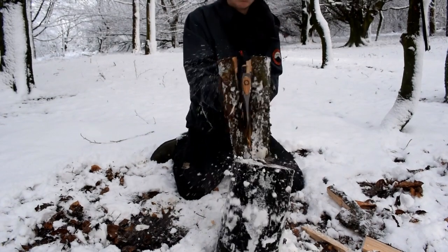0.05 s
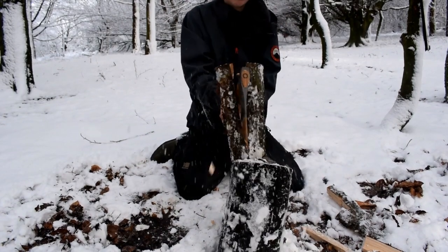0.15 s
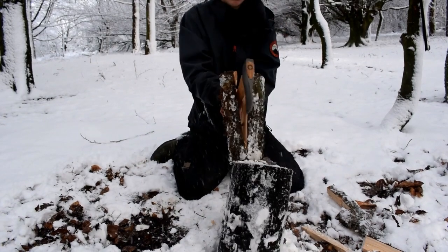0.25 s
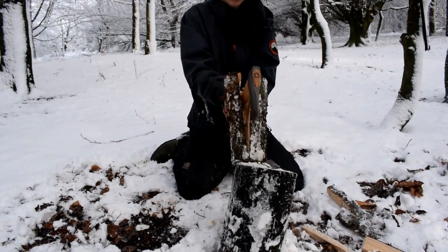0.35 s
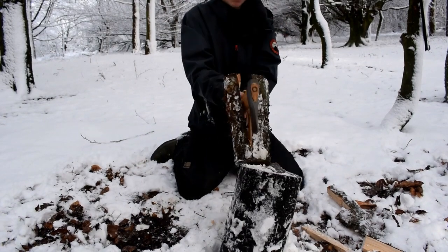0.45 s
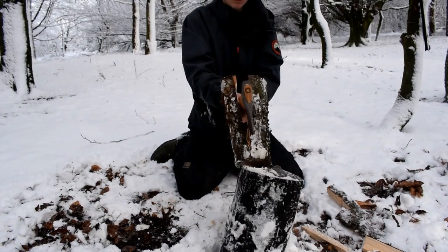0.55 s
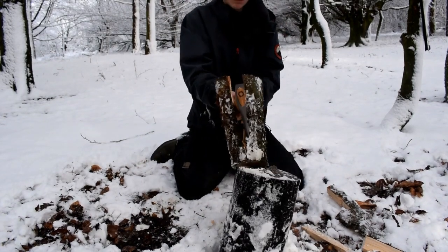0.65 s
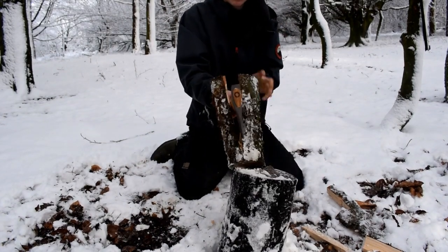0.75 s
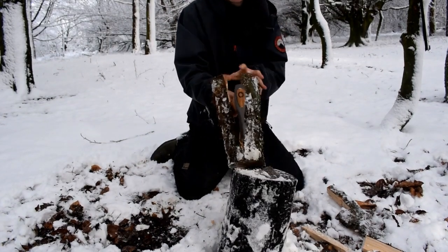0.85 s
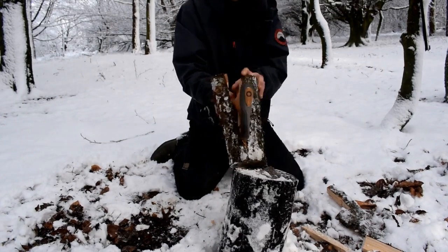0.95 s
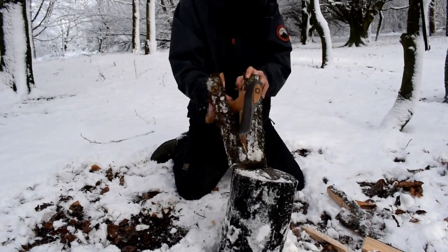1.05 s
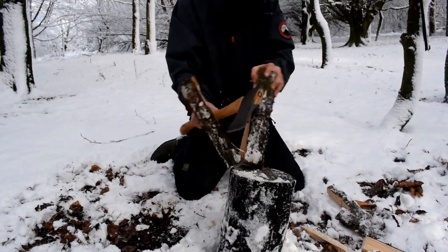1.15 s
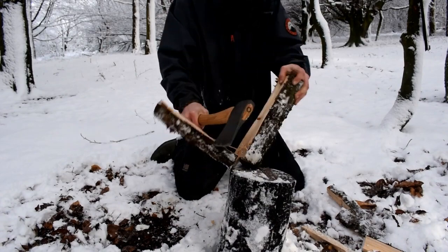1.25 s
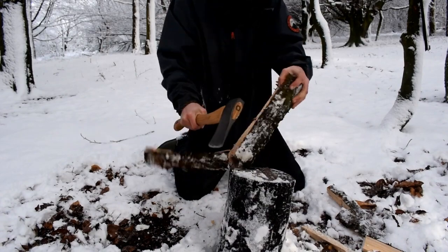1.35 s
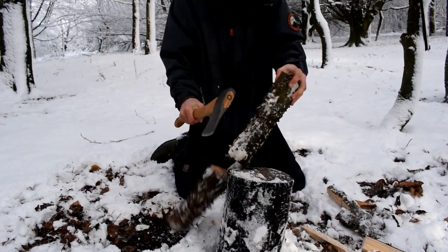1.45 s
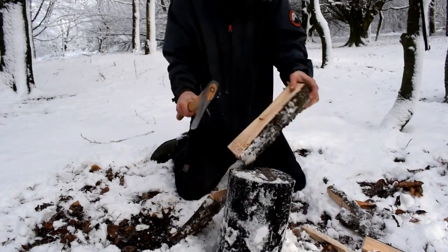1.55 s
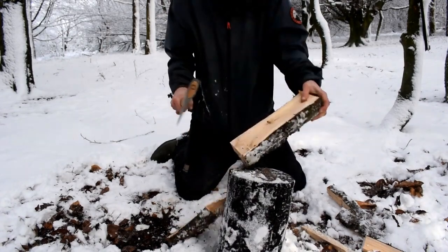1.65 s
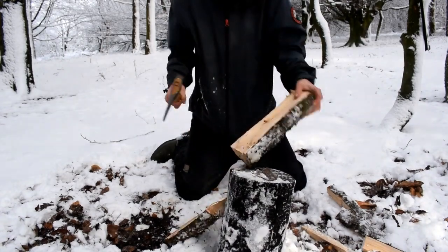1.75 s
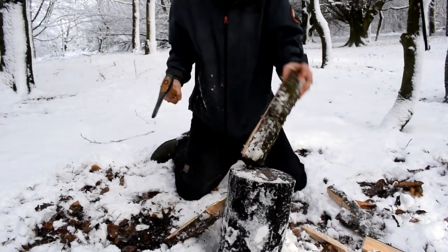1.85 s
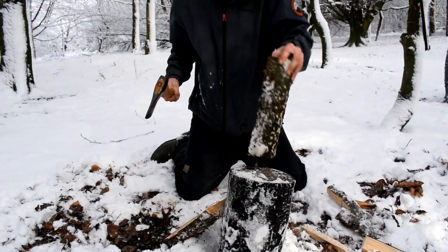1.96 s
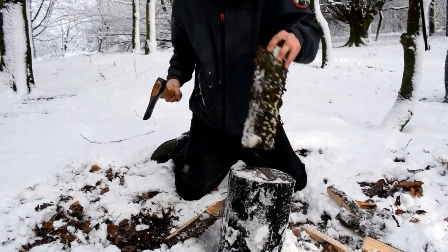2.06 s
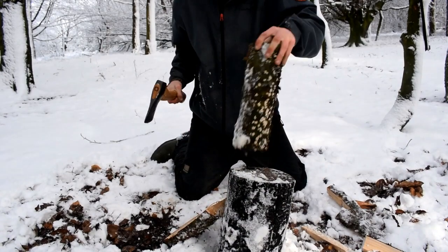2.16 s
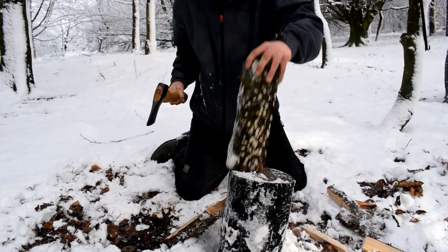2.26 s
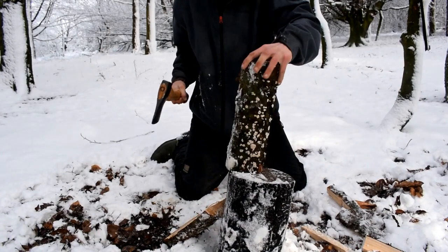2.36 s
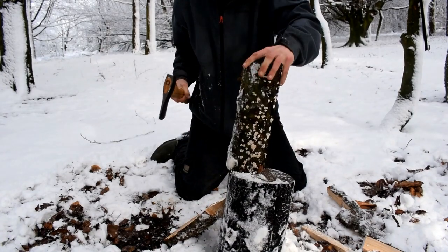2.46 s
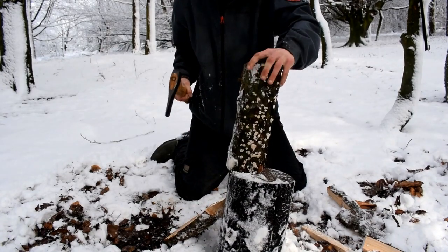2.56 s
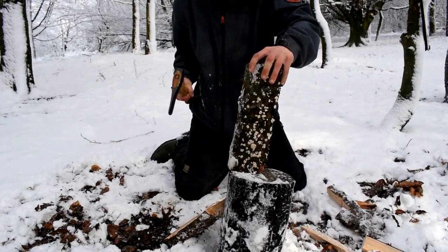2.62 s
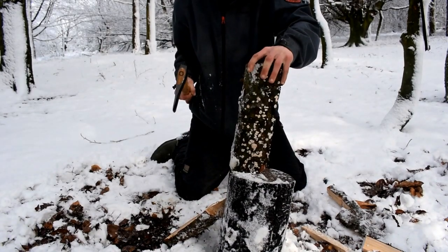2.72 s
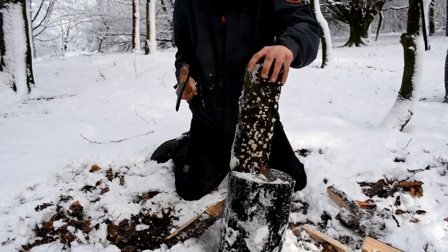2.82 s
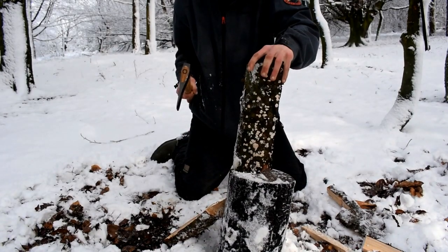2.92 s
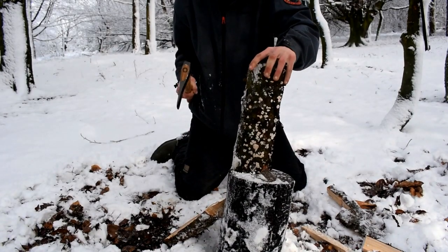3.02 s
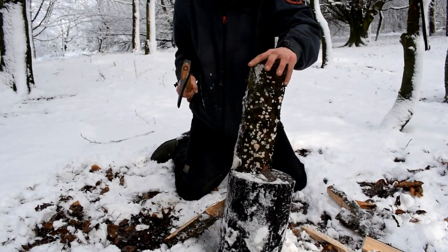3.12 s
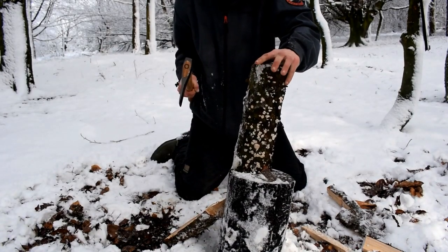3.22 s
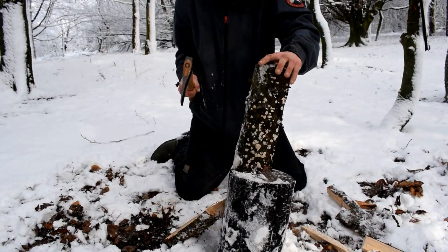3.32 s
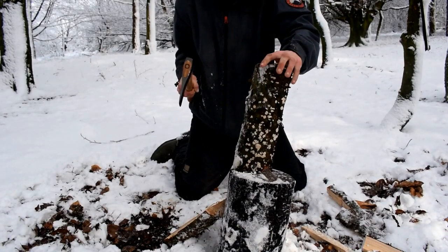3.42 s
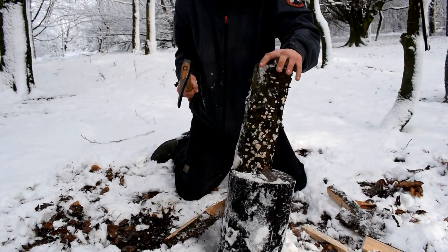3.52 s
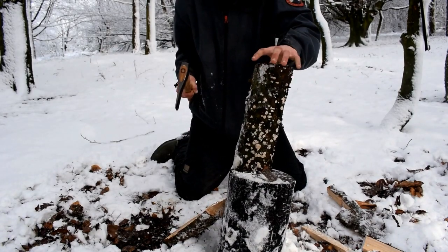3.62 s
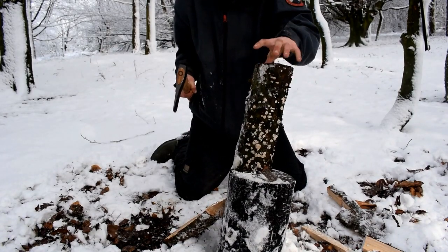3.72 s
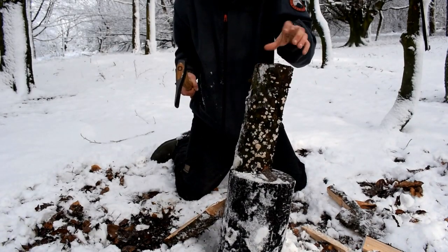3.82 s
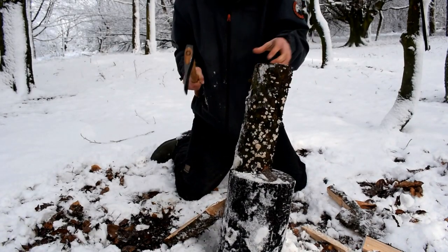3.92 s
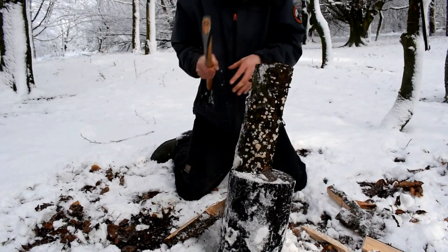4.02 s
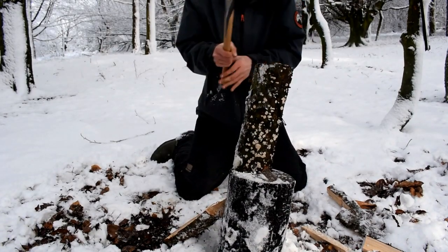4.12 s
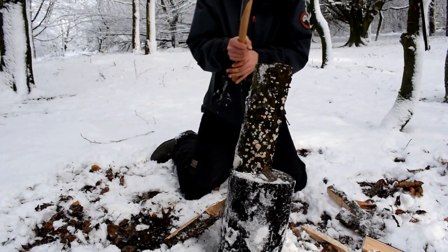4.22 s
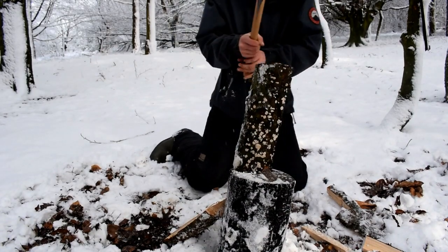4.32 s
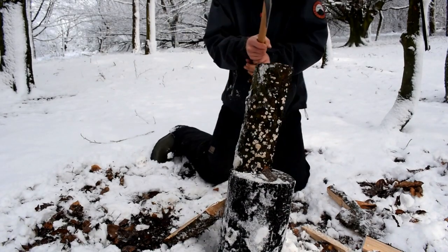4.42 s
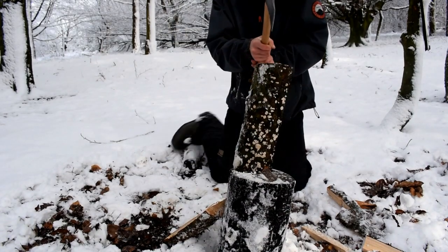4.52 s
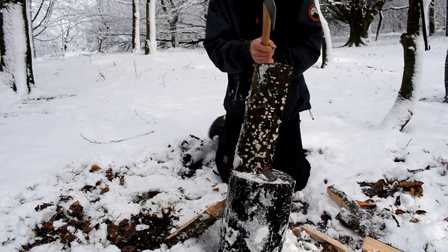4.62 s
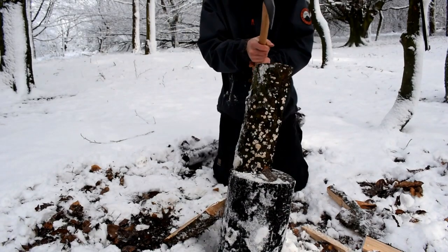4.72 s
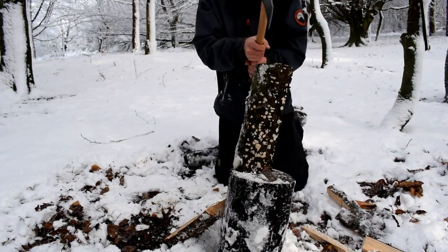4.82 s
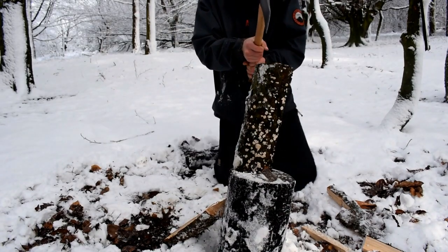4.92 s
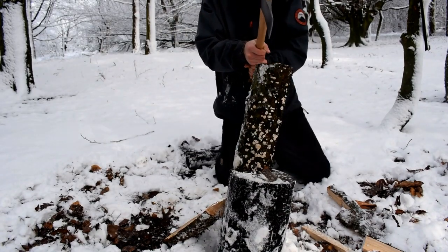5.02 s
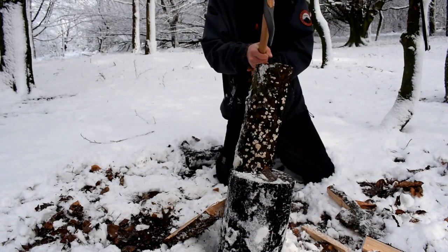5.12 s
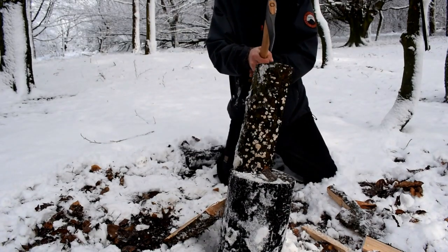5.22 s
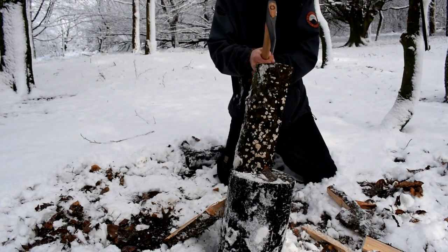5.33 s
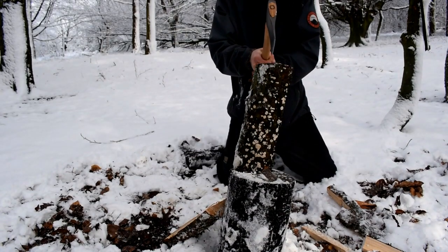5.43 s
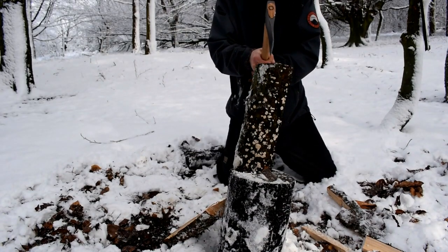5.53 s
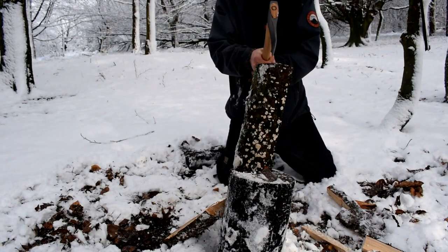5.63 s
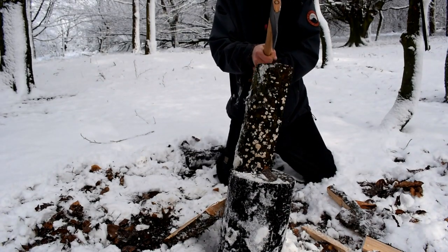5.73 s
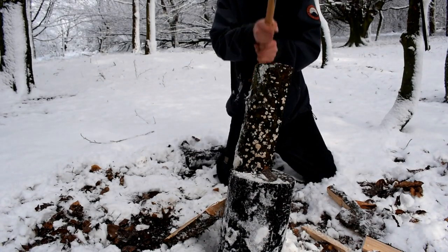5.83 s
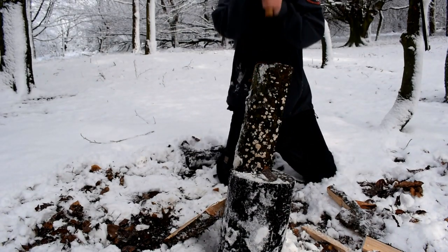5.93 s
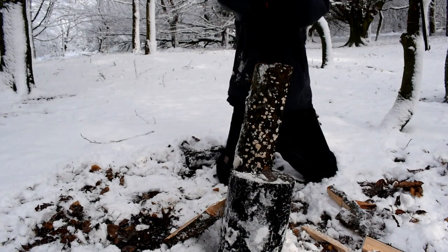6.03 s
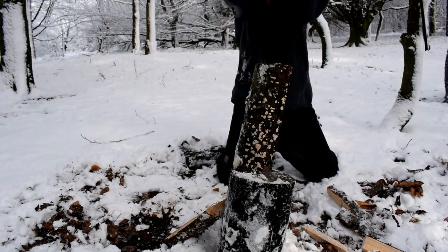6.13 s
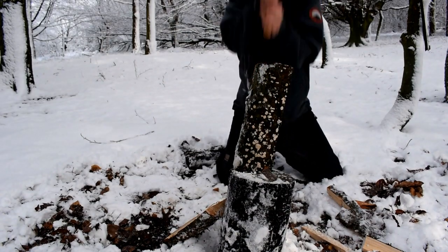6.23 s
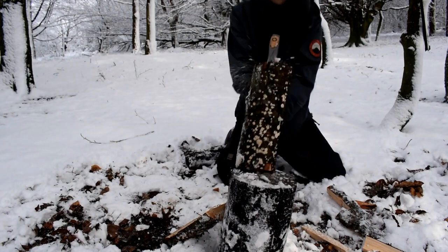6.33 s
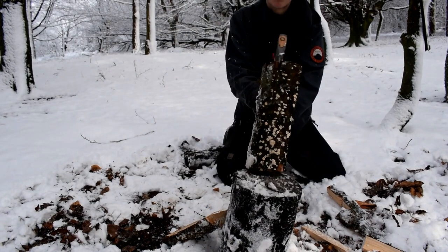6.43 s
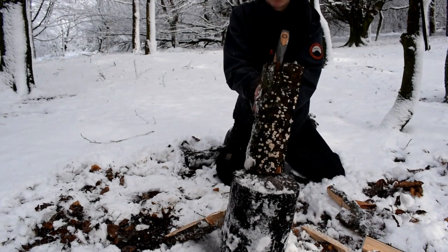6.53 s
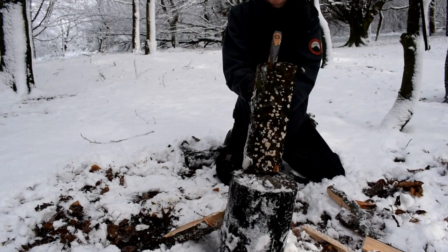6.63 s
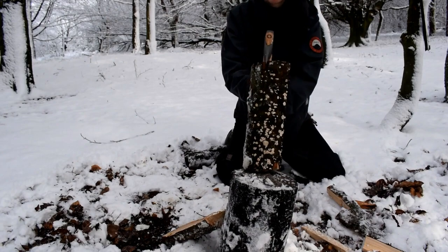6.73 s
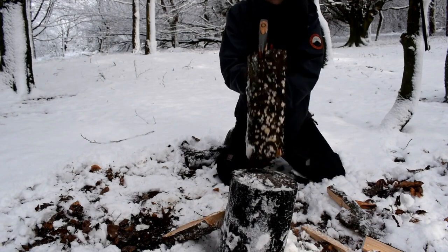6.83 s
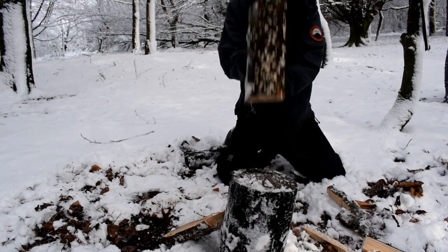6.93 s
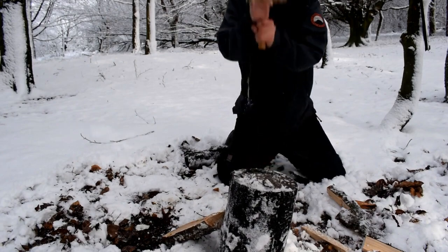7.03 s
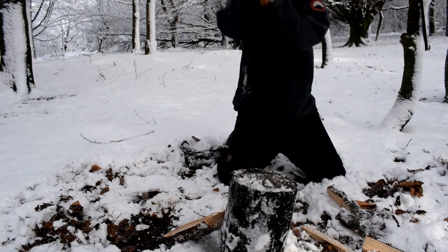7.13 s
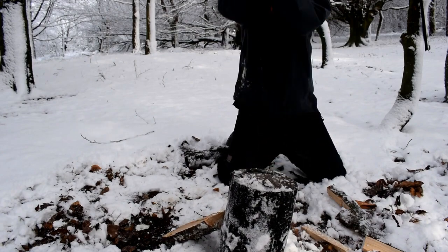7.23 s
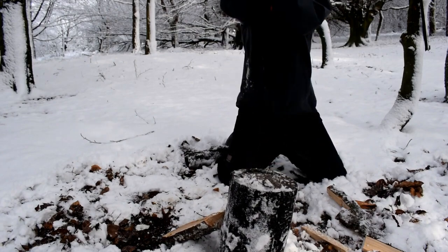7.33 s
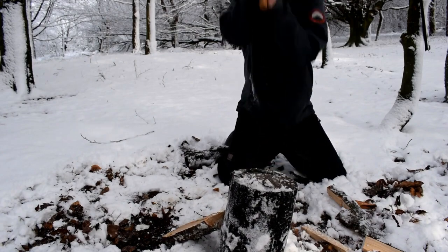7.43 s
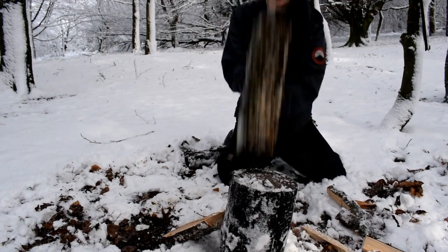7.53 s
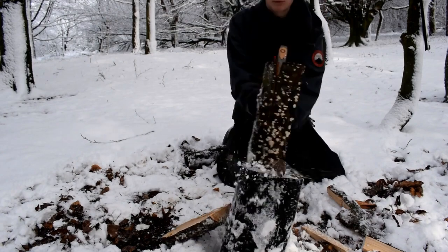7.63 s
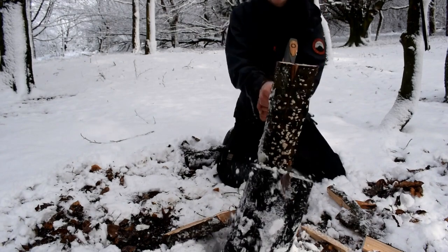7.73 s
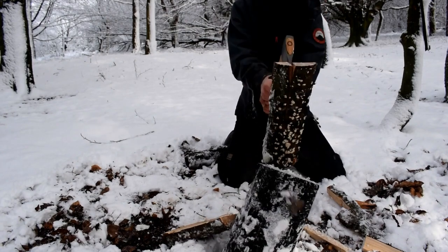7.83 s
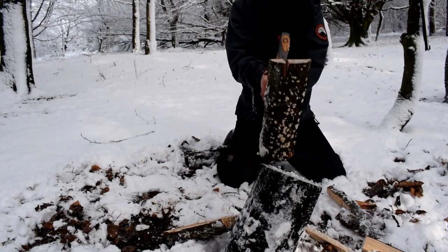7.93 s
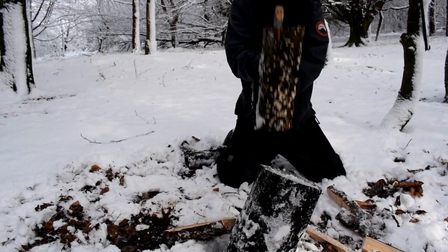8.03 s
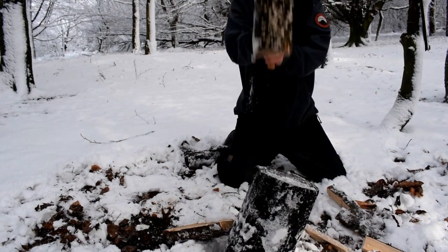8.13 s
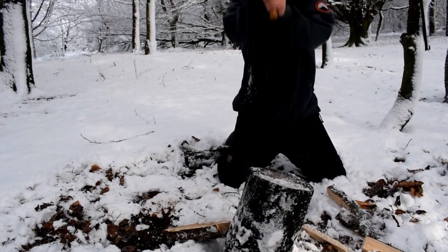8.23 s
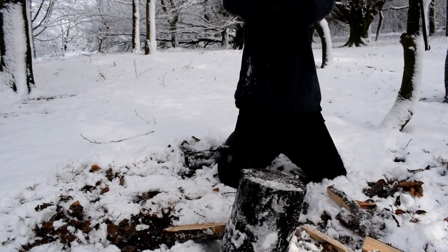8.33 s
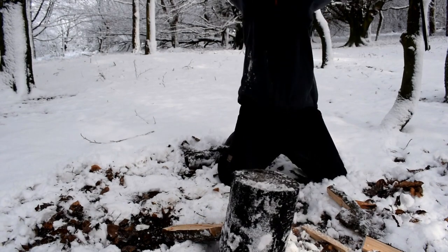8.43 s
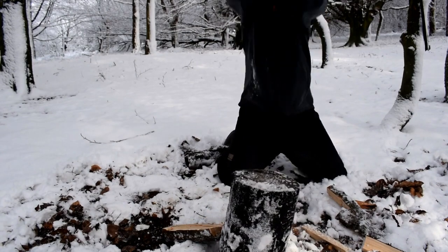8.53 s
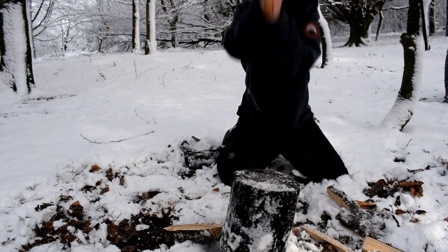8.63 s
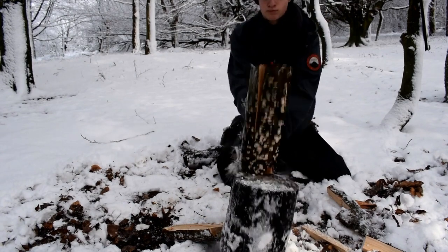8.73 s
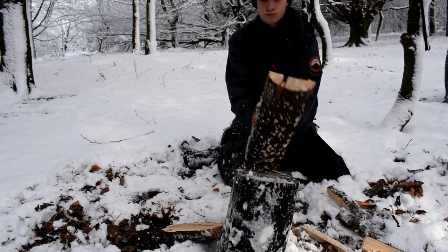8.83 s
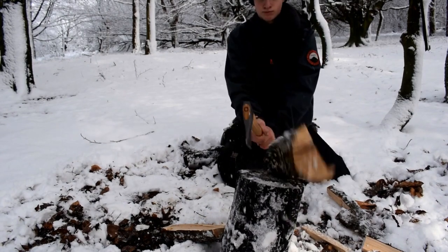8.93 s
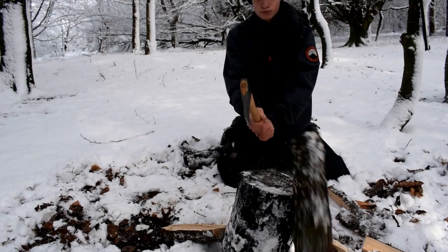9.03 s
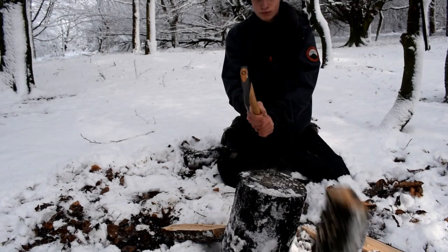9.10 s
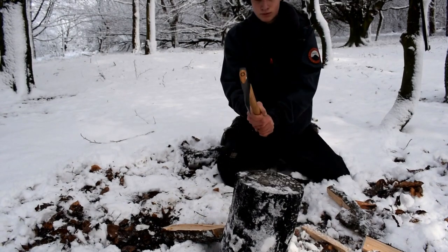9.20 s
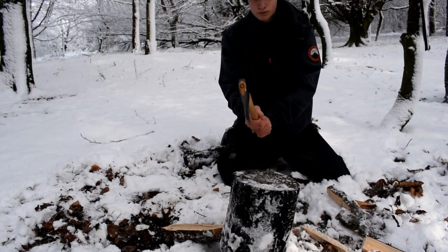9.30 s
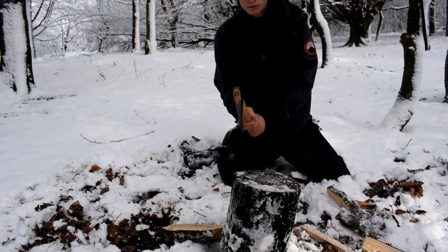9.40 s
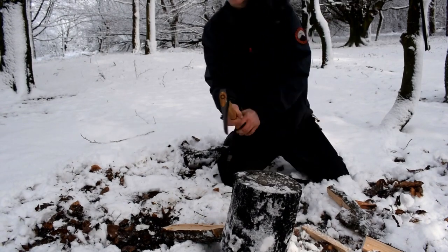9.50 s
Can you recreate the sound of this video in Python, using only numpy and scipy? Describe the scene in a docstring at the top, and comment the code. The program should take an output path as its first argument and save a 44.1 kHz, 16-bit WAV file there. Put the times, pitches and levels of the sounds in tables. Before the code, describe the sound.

A log with a hatchet stuck in it bangs onto a chopping block; wood cracks, pieces knock, and knees shift softly in snow.

```python
"""Splitting logs in snowy woods

A hatchet stuck in a log is slammed onto a chopping block, so close that the small microphone overloads.
Each chop thumps the block, rings the log and splinters it; fibres snap, and the halves fall and knock.
Close by, a jacket rustles and knees shift in the snow. The trunks send back a short echo,
and a steady rush lies far behind."""
import sys
import numpy as np
from scipy import signal
from scipy.fft import rfft, irfft, next_fast_len
from scipy.io import wavfile
from scipy.ndimage import uniform_filter1d, map_coordinates

SR = 44100
rng = np.random.default_rng(int(sys.argv[2]) if len(sys.argv) > 2 else 0)


def generate_wav(signal):
    """Clip the signal to [-1, 1] and save it as 16-bit WAV at the path in sys.argv[1]."""
    frames = np.transpose(np.atleast_2d(signal))
    scaled = np.clip(frames, -1, 1) * 32767
    pcm = np.round(scaled).astype(np.int16)
    wavfile.write(sys.argv[1], SR, pcm)


N = 421596

# Noise colours of the distant rush, cloth, snow and splintering wood: frequency_hz, density_db
RUSH_SPECTRUM = [(12, -49.5), (20, -17.5), (55, -6), (96, -1.5), (150, -8.5), (241, -11), (310, -6.5),
                 (367, -10.5), (399, -15), (434, -13.5), (897, -16), (976, -13), (1810, -24.5), (3630, -35),
                 (16000, -56)]
JACKET_SPECTRUM = [(590, -26), (1000, -1.5), (1160, -2.5), (1350, -1), (2180, -2.5), (2910, -3),
                   (4260, -4.5), (9830, -11), (12500, -14), (16000, -29)]
SNOW_SPECTRUM = [(35, -32.5), (60, -4), (317, -2.5), (559, -5.5), (686, -9.5), (900, -7), (1170, -32),
                 (1980, -120)]
CRACK_SPECTRUM = [(100, -27.5), (600, 4.5), (2000, -6.5), (5000, -9), (7000, -13), (10000, -16.5),
                  (16000, -28.5)]
# Moves of arms and knees, at relative levels: start_s, hold_s, jacket_db, snow_db
BODY_MOVES = [(.2, 0.38, -58, -46.5), (0.705, 0.83, -63.5, -54.5), (1.12, 0.05, -54, -50.5),
              (1.571, .18, -56, -49), (2.303, .4, -66.5, -52), (3.846, 0.16, -62, -52.5),
              (4.082, 0.089, -50.5, -48), (4.262, 0.081, -55, -48), (4.366, 0.13, -51.5, -50.5),
              (4.519, 0.18, -49, -45), (4.956, 0.23, -53.5, -49), (5.938, 0.67, -59, -50),
              (7.088, 0.305, -64.5, -60), (7.91, 0.95, -59.5, -57), (8.703, 0.073, -49, -42.5),
              (9.263, 0.045, -45, -46.5), (9.35, 0.14, -49.5, -46)]
# Chops on the block: start_s, thump_db, ring_db, crack_db, rebound_lag_s, rebound_ring_db,
# split_lag_s, split_db, echo_send_db, jacket_and_snow_boost_db
HATCHET_CHOPS = [(0.0336, 11.5, 6.5, 7, .0103, 8.5, .0193, -4, 1, 4.5),
                 (6.3589, 4.5, -6.5, 6.5, .0077, -23, .016, -8.5, -10, 1),
                 (7.621, 8.5, 10.5, 8, .0086, -5, .0086, -10, -0.5, 1),
                 (8.796, 12, 13, -2.5, .016, -0.5, .0106, 7.5, 0, 3)]
# Pieces of log knocking, landing, set down: start_s, thump_db, pitch_hz, ring_db, crack_db
LOG_KNOCKS = [(1.0785, -23.5, 222, -33, -36), (1.095, -43, 300, -40.5, -30), (1.576, -17, 108, -53.5, -21),
              (1.607, -6.5, 285, -22, -33.5), (1.609, -11, 634, -34, -48.5), (2.3524, 7, 384, -12.5, -24),
              (2.356, -4, 226, -24, -65), (2.37, -11, 247, -46, -42.5), (9.0414, -6.5, 277, -12.5, -17.5),
              (9.043, -16, 900, -36, -45.5), (9.296, -24, 378, -41, -22), (9.304, -9.5, 89, -40, -24)]
# Modes of the thick log, split first, and of the half chopped next: pitch_hz, weight_db, t60_s
THICK_LOG_MODES = [(941, -4.5, 0.049), (1260, 2, 0.033), (1674, -5, 0.064), (2297, -7, 0.028),
                   (2950, -7.5, 0.037)]
HALF_LOG_MODES = [(1021, -16, 0.07), (1276, -11.5, 0.12), (1803.4, -2, 0.059), (2465, -14, 0.056),
                  (3230, -11, 0.011)]
# Echo off the surrounding trunks: frequency_hz, relative_db, t60_s
TRUNK_RETURNS = [(150, -29, .2), (506, -9.5, 0.65), (1220, 2, 0.83), (2280, -2.5, 0.75), (3407, -6.5, 0.56),
                 (5500, -10, 0.32), (12000, -19.5, 0.4)]
# The clearest snaps of fibre and bark: start_s, level_db, pitch_hz, relative_body_db
FIBRE_SNAPS = [(0.2114, -29, 3305, 7), (0.3274, -30, 5180, -15), (0.3414, -30, 3850, -12),
               (0.4898, -37, 6640, -18), (0.573, -33, 5070, -12), (0.6044, -37, 4530, 0),
               (0.975, -33, 4220, -30), (0.9864, -36, 9670, -3), (1.0988, -28.5, 4120, -15),
               (1.135, -33, 5050, -9), (1.163, -32, 8220, -18), (1.175, -30, 4870, -12),
               (1.1894, -33, 3500, -14), (1.259, -33, 4360, -6), (1.451, -37.5, 6430, -19.5),
               (6.1444, -43.5, 3460, 6), (6.76, -24, 3470, -6.5), (6.7664, -29, 3270, -26),
               (6.778, -36.5, 6510, -20), (6.838, -36, 3720, -24), (6.8838, -35.5, 5800, -27),
               (8.102, -36.5, 8640, -21), (8.1144, -35.5, 7010, -19), (8.262, -38.5, 4800, -7),
               (8.717, -22, 3600, -9), (8.8543, -32.5, 3490, 6), (9.128, -27, 4490, -29),
               (9.241, -23, 5070, -14)]
# Spells of faint crackle in strained wood: start_s, end_s, typical_level_db
CRACKLE_SPELLS = [(.3, 0.649, -41), (1.0, 1.33, -41), (6.7, 6.95, -44), (7.9, 8.3, -44.5)]
# Dull bumps of knees, boots and the rocking block: start_s, level_db, pitch_hz
DULL_BUMPS = [(4.15, -33, 427), (4.163, -31, 355), (4.339, -38, 203), (4.549, -33.5, 261),
              (4.584, -28.5, 315), (4.674, -29.5, 155), (4.792, -32, 168), (4.918, -33.5, 342),
              (5.179, -29, 556), (5.207, -32.5, 269), (5.227, -36, 353), (5.999, -31, 139),
              (6.086, -28, 159), (6.128, -33.5, 159), (6.297, -26.5, 248), (7.451, -30.5, 430),
              (8.618, -31.5, 186), (8.717, -24, 170), (8.738, -20, 217), (8.764, -21, 624),
              (9.455, -32, 200)]

# The thumps within a chop: relative_db, pitch_hz, t60_cycles
STRIKE, BLOCK, REBOUND, GROUND = (0, 457, 9.5), (-8, 150, 6.9), (-4, 334, 8.8), (-23, 61, 6.2)
BLOCK_LAG_S, GROUND_LAG_S, CRACK_T60_S, SPLIT_T60_S = .0017, .015, .038, .035
KNOCK_CYCLES, KNOCK_CRACK_T60_S, KNOCK_SEND_DB = 5.23, .033, -11
HALF_LOG_FROM_S, PARTING_S = 2, (1.09, 1.27)
SNAP_T60_S, SLIP_T60_S, CRACKLE_PER_S, CRACKLE_HZ = .011, .052, 34, 4800
ONSET_DB_PER_S, RELEASE_DB_PER_S = 220, 76
# Pairs for (jacket, snow): at rest, swinging into a chop and settling after it
STILL_DB, SWING_DB, SETTLE_DB = (-68.5, -57), (-49.5, -36.5), (-51, -42)
SWING_DB_PER_S, SETTLE_DB_PER_S = (148, 148), (37.5, 44)


def amp(db):
    """Decibels to gain."""
    return 10 ** (np.asarray(db) / 20)


def unit(x):
    """The signal at rms 1."""
    return x / np.sqrt(np.mean(x ** 2) + 1e-20)


def along(table, hz, column=1):
    """One column of a table, read on a log frequency axis."""
    points = np.array(table)
    return np.interp(np.log(hz + 1), np.log(points[:, 0] + 1), points[:, column])


def wobble(rate):
    """A smooth random curve, rate knots a second."""
    knots = rng.standard_normal(int(N * rate / SR) + 4)
    return map_coordinates(knots, [np.arange(N) * rate / SR])


def filtered(x, response):
    """The signal through a frequency response."""
    size = next_fast_len(len(x) + 8192)
    return irfft(rfft(x, size) * response(np.fft.rfftfreq(size, 1 / SR)), size)[:len(x)]


def resonance(f, hz, width_hz):
    """Band-pass response of one mode centred on hz."""
    return 1j * f * width_hz / (hz * hz - f * f + 1j * f * width_hz)


def noise(spectrum, grain_db=0, per_s=1000):
    """Coloured noise of rms 1, made grainy by a fast random level."""
    white = rng.standard_normal(N) * amp(grain_db * wobble(per_s))
    return unit(filtered(white, lambda hz: amp(along(spectrum, hz))))


def patchy(x, depth_db):
    """Random gain over patches of time and frequency."""
    bins = signal.stft(x, nperseg=512)[2]
    patches = uniform_filter1d(rng.standard_normal(bins.shape), size=24, axis=0)
    patches = uniform_filter1d(patches, size=12, axis=1)
    return unit(signal.istft(bins * amp(depth_db * unit(patches)), nperseg=512)[1][:N])


def add(track, start_s, sound):
    """Lays a sound into the track."""
    part = track[round(start_s * SR):][:len(sound)]
    part += sound[:len(part)]


def far_rush():
    """A steady rush in the distance, its level drifting a little."""
    return amp(-51.5 + .58 * wobble(7.3)) * noise(RUSH_SPECTRUM)


def effort_db(layer):
    """Level of jacket (0) or snow (1): moves swell, hold and ease off; chops swing in and settle."""
    t = np.arange(N) / SR
    level = np.full(N, float(STILL_DB[layer]))
    for start, hold, *held_db in BODY_MOVES:
        onset = ONSET_DB_PER_S * np.maximum(start - t, 0)
        release = RELEASE_DB_PER_S * np.maximum(t - start - hold, 0)
        level = np.maximum(level, held_db[layer] - onset - release)
    for start, *_, boost_db in HATCHET_CHOPS:
        swing = SWING_DB[layer] - SWING_DB_PER_S[layer] * (start - t)
        settle = SETTLE_DB[layer] + boost_db - SETTLE_DB_PER_S[layer] * (t - start)
        level = np.maximum(level, np.where(t < start, swing, settle))
    return level


def jacket_rustle():
    """Cloth rubs beside the microphone in grainy patches."""
    cloth = noise(JACKET_SPECTRUM, grain_db=1.5, per_s=1400)
    return amp(effort_db(0) + 4.5) * patchy(cloth, depth_db=2)


def snow_crunch():
    """Snow packs under the knees in dull lumps."""
    lumps_db = 1.5 * wobble(18)
    return amp(effort_db(1) - 1.5 + lumps_db) * noise(SNOW_SPECTRUM, per_s=34)


def contacts():
    """A chop strikes, shakes block and ground, rebounds and splits; a knock is a single contact."""
    silent = -99
    for start, db, ring, crack, rebound_lag, rebound_ring, split_lag, split, send, _ in HATCHET_CHOPS:
        parts = [(0, STRIKE, ring, crack), (BLOCK_LAG_S, BLOCK, silent, silent),
                 (rebound_lag, REBOUND, rebound_ring, silent), (GROUND_LAG_S, GROUND, silent, silent)]
        for lag, (relative_db, hz, cycles), ring_db, crack_db in parts:
            yield start + lag, db + relative_db, hz, cycles / hz, ring_db, crack_db, CRACK_T60_S, send
        yield start + split_lag, silent, 100, .01, silent, split, SPLIT_T60_S, send
    for start, db, hz, ring, crack in LOG_KNOCKS:
        yield start, db, hz, KNOCK_CYCLES / hz, ring, crack, KNOCK_CRACK_T60_S, KNOCK_SEND_DB


def log_ring(t, modes, level_db):
    """Cracked wood holds no pitch: each mode's phase wanders, more under a hard blow."""
    hardness = np.clip((level_db + 27.5) / 40, .15, 1)
    jitter = uniform_filter1d(rng.standard_normal((len(modes), len(t))), size=24)
    wander = .17 * hardness * np.cumsum(jitter, axis=1)
    contrast = 1.77 - .36 * hardness  # hard blows ring the modes more evenly
    ring = np.zeros(len(t))
    for (hz, weight_db, t60), phase in zip(modes, wander):
        mode_db = level_db + weight_db * contrast + rng.normal(0, 1.6)
        ring += amp(mode_db - 60 * t / t60) * np.sin(2 * np.pi * hz * t + phase)
    return ring * (1 - np.exp(-t / .0022))


def chops_and_knocks():
    """Each contact thumps, rings and splinters; returns the close sound and what reaches the trunks."""
    close, to_trunks, t = np.zeros(N), np.zeros(N), np.arange(SR // 4) / SR
    splinters = noise(CRACK_SPECTRUM, grain_db=6, per_s=700)
    impulse = signal.unit_impulse(len(t), 88)  # 2 ms into the contact
    click = filtered(impulse, lambda hz: amp(along(CRACK_SPECTRUM, hz)) * hz / (hz + 1500))
    click /= np.linalg.norm(click)
    rise = 1 - np.exp(-(t / .0011) ** 2)
    for start, thump_db, hz, t60, ring_db, crack_db, crack_t60, send_db in contacts():
        # the contact relaxes, so the thump falls in pitch
        cycles = hz * (t + .00324 * (1 - np.exp(-t / .003)))
        thump = -amp(thump_db - 60 * t / t60) * np.sin(2 * np.pi * cycles)
        ring = log_ring(t, THICK_LOG_MODES if start < HALF_LOG_FROM_S else HALF_LOG_MODES, ring_db)
        crack = amp(crack_db - 60 * t / crack_t60) * np.resize(splinters[round(start * SR):], len(t))
        add(close, start, rise * (thump + crack) + ring)
        # the trunks answer mostly the first, broadest instant of the crack
        crack_front = amp(crack_db + 21.5) * click
        add(to_trunks, start, amp(send_db) * (rise * thump + crack_front + amp(-5) * ring))
    return close, to_trunks


def trunk_echo(x):
    """Scattered returns from the trunks build up, come in lumps and die away band by band."""
    scatter = rng.standard_normal(SR) * amp(3 * wobble(90)[:SR])
    hz, t, bins = signal.stft(scatter, SR, nperseg=256)
    t60 = along(TRUNK_RETURNS, hz, column=2)[:, None]
    decay = amp(along(TRUNK_RETURNS, hz)[:, None] - 60 * t / t60)
    build_up = 1 - np.exp(-(t / .022) ** 2)
    tail = signal.istft(bins * decay * build_up, SR, nperseg=256)[1]
    return signal.fftconvolve(x, tail / np.linalg.norm(tail))[:N]


def fibre_snaps(snaps):
    """Breaking fibres: short noise bursts, each with its own bright resonance and a woody body."""
    track, t = np.zeros(N), np.arange(SR // 20) / SR
    for start, db, hz, body_db in snaps:
        burst = rng.standard_normal(len(t)) * amp(-60 * t / SNAP_T60_S)
        bright = filtered(
            burst, lambda f: (.44 + resonance(f, hz, .45 * hz)) * (1j * f / (2200 + 1j * f)) ** 2)
        body = filtered(burst, lambda f: resonance(f, hz=1800, width_hz=1300) ** 2)
        body *= amp(min(body_db, 6) + 1) / np.abs(body).max()
        add(track, start, amp(db) * (bright / np.abs(bright).max() + body))
    return track


def crackle():
    """Strained wood gives way at random: rows of faint snaps within each spell."""
    snaps = []
    for start, end, db in CRACKLE_SPELLS:
        draws = rng.standard_normal((16, 4))
        times = start + np.cumsum(np.exp(.6 * draws[:, 0])) / CRACKLE_PER_S
        snaps += [(at, db + 2.5 * level, CRACKLE_HZ * np.exp(.36 * pitch), -4.5 + 5 * body)
                  for at, (_, level, pitch, body) in zip(times, draws) if at < end]
    return snaps


def tearing():
    """As the halves are pulled apart, each clear snap is a slip that shakes one rough mode of the log."""
    slips, t = np.zeros(N), np.arange(SR // 20) / SR
    for start, db, *_ in FIBRE_SNAPS:
        if PARTING_S[0] < start < PARTING_S[1]:
            add(slips, start, amp(db - 60 * t / SLIP_T60_S) * rng.standard_normal(len(t)))
    return amp(11.5) * filtered(slips, lambda f: resonance(f, hz=1580, width_hz=150))


def bumps():
    """Knees, boots and the rocking block give soft low pushes, each with a puff of packed snow."""
    track, t = np.zeros(N), np.arange(SR // 10) / SR
    rise = 1 - np.exp(-(t / .0016) ** 2)
    for start, db, hz in DULL_BUMPS:
        push = np.sin(2 * np.pi * hz * t) * amp(-60 * t * hz / 8.4)
        burst = rng.standard_normal(len(t)) * amp(-60 * t / .045)
        puff = filtered(burst, lambda f: 1 / (1 + 1j * f / 650) ** 2)
        add(track, start, amp(db) * rise * (push + .8 * puff / np.abs(puff).max()))
    return track


def scene():
    """The woods in mono, from beside the chopping block."""
    blows, to_trunks = chops_and_knocks()
    small_sounds = fibre_snaps(FIBRE_SNAPS + crackle()) + tearing() + bumps()
    echo = amp(-23.5) * trunk_echo(to_trunks + small_sounds)
    return (blows + small_sounds + echo + jacket_rustle() + snow_crunch() + far_rush())[None]


def record(dry):
    """The small microphone overloads on the chops, and its treble ends near 16 kHz."""
    overloaded = np.clip(dry[0], -.99, .99)
    band_limited = filtered(overloaded, lambda hz: (hz < 16200) / (1 + (hz / 16000) ** 12))
    return np.clip(band_limited, -1, 1)[None]


dry = scene()
out = record(dry)
generate_wav(out)
```